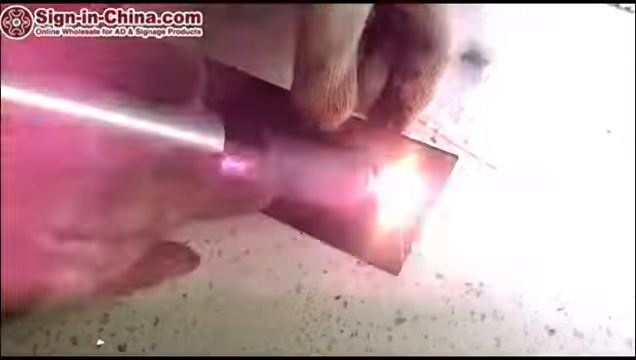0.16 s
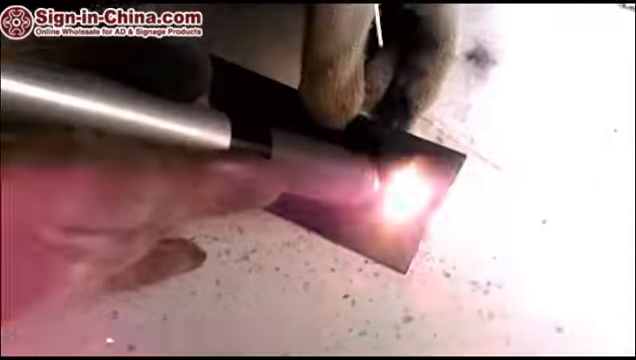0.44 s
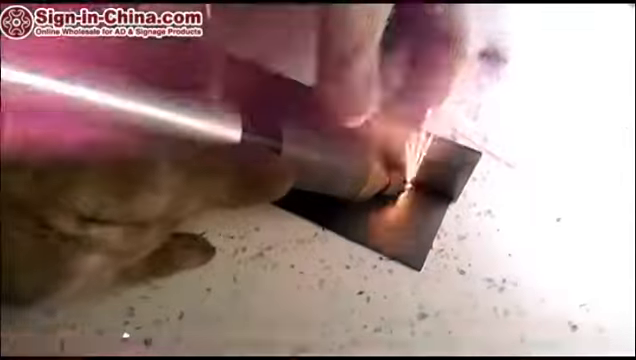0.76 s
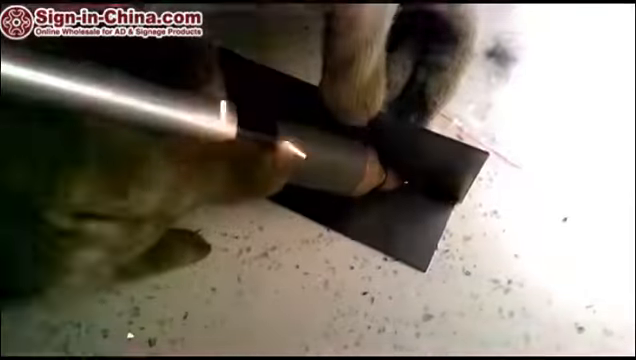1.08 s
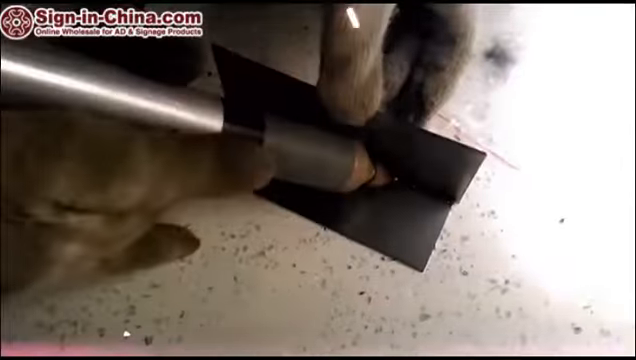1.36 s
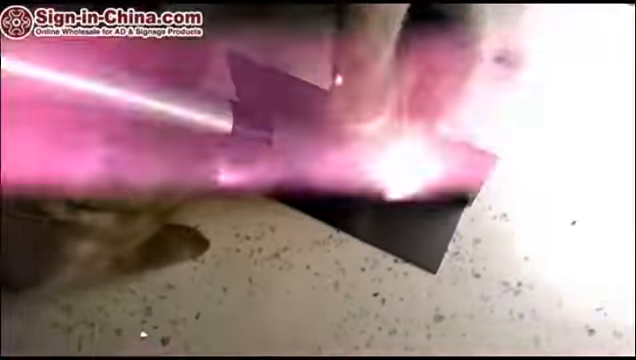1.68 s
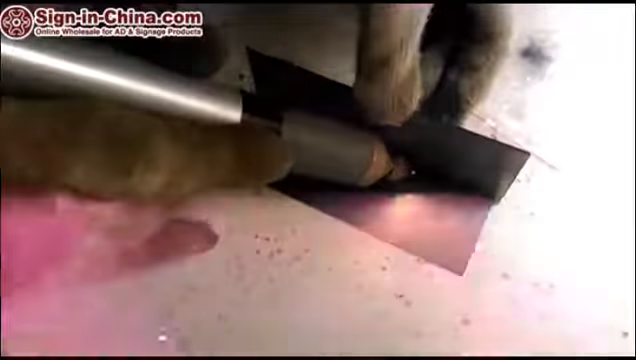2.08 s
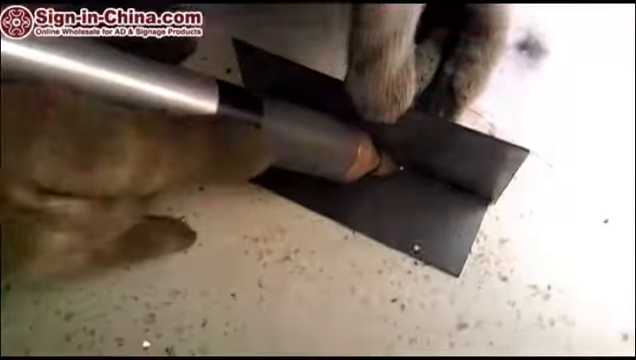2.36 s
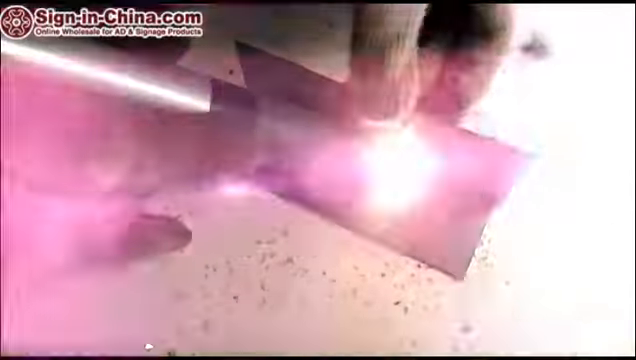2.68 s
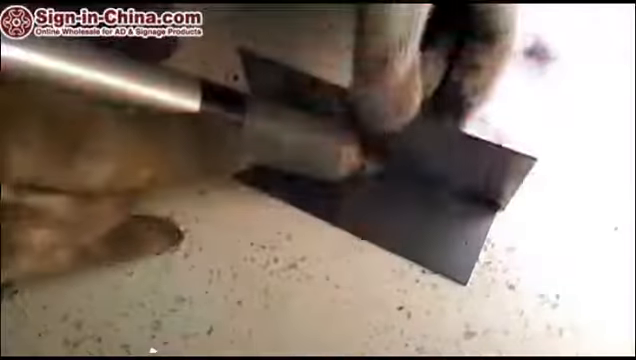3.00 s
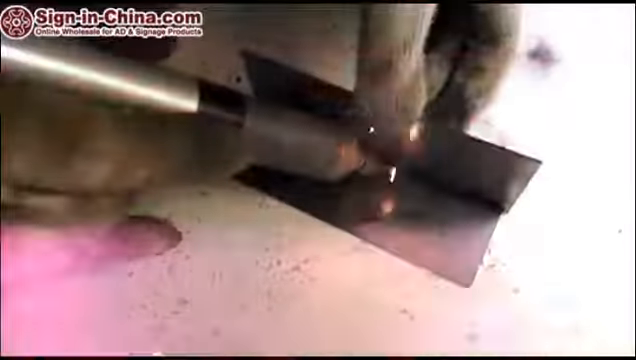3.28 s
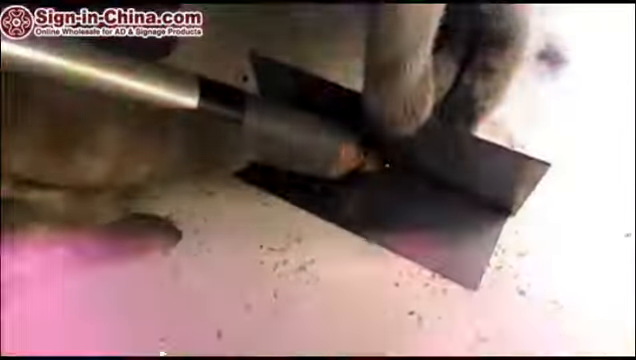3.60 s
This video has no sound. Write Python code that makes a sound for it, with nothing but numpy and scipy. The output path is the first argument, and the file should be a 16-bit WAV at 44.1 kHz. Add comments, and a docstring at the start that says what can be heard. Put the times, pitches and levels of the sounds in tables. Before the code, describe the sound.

A pulsed laser welder starts firing on a thin steel sheet at about 0.2 seconds, close by, over a low hum of machine fans. Its sharp, crackling pops repeat evenly, about eighteen a second, until the end near 3.7 seconds, with sizzling spatter, faint metallic ringing and a short room echo. The nozzle scrapes softly underneath, most around 1 second. A faint, very high whistle grows from about 2 seconds.

```python
"""Pulsed laser welding on thin steel

A hand-held laser welder fires evenly at a small steel sheet on a table, close to a two-port camera mic.
Each pulse pops as it starts and stops, the plume crackles in between, the sheet rings and spatter sizzles.
Walls echo the pops and crackle over the machine's hum and fans and the low scrape of the dragged nozzle."""
import sys
import numpy as np
from scipy import signal
from scipy.fft import rfft, irfft
from scipy.io import wavfile
from scipy.ndimage import uniform_filter1d

SR = 44100
rng = np.random.default_rng(int(sys.argv[2]) if len(sys.argv) > 2 else 0)


def unload_wav(signal):
    """Save mono or channel-first audio to the path in sys.argv[1] as 16-bit WAV at rate SR, clipped to [-1, 1]."""
    wavfile.write(
        sys.argv[1],
        SR,
        np.round(np.clip(np.atleast_2d(signal).T, -1, 1) * 32767).astype(np.int16),
    )


N = 164934

# Hum and fan bed EQ (frequency [Hz], level [dB])
FAN_EQ = [(35, -13), (139, 1), (300, -3), (2410, -13.5), (11800, -36.5), (16000, -55)]
# Beam-on pop, then beam-off pop (resonance [Hz], width [Hz], bass cut [Hz], relative level [dB])
POP_TONES = [(1470, 920, 139.5, 6), (1760, 1240, 193, 2)]
# Rings of the joint, a row per pulse (low ring [Hz], low ring [dB], middle ring [dB], upper pair [dB])
PULSES = [(2930, -27.5, -38, -23.5), (2900, -30.5, -51, -24.5), (2810, -25.5, -30, -25),
          (2730, -29, -41, -27), (3020, -32, -30, -27), (2760, -27.5, -30, -24), (2900, -25, -41, -28),
          (2330, -29, -39, -31), (2480, -26, -53, -26), (2600, -34, -40, -33.5), (2670, -27, -41, -28),
          (2600, -28, -54, -21), (2900, -30, -35, -30.5), (2730, -25.5, -27.5, -23), (2500, -29, -50, -30),
          (2600, -25, -37, -24.5), (2750, -27.5, -52, -30), (2540, -25.5, -34, -31.5),
          (2880, -26.5, -36, -28.5), (2550, -25.5, -25.5, -25), (2930, -26.5, -32, -23.5),
          (2660, -24.5, -33, -19.5), (2670, -25, -23, -24), (2830, -28.5, -30, -28), (2940, -26, -35, -27),
          (2800, -25.5, -29.5, -37), (2680, -27.5, -34, -30.5), (2800, -26, -29, -25.5),
          (3070, -28, -32, -23.5), (2940, -30, -29, -30.5), (2500, -29.5, -34.5, -30),
          (2780, -23.5, -29.5, -30), (2560, -24, -29.5, -29), (2660, -23.5, -40, -32.5),
          (2620, -23, -30, -25.5), (2820, -25, -27, -31), (2630, -22, -27.5, -24), (2850, -27, -26, -26),
          (2420, -25, -34, -24), (2760, -22.5, -30, -25), (2720, -22, -34, -27), (3320, -33, -35, -26.5),
          (2330, -22.5, -33, -30), (2620, -27.5, -46, -24.5), (2600, -26.5, -36, -24),
          (2660, -23.5, -32, -25), (2640, -25, -35, -24.5), (2640, -23, -52, -29), (2610, -21.5, -36, -28),
          (2530, -20.5, -23, -28.5), (2460, -24.5, -25.5, -24), (2280, -31, -24.5, -26.5),
          (2730, -28.5, -29.5, -27), (2480, -21, -34, -27.5), (2510, -16, -36, -22.5),
          (2510, -24.5, -18, -30), (3340, -32, -27, -27.5), (2520, -24, -26, -26),
          (2920, -26.5, -30.5, -25.5), (2480, -24.5, -35, -27), (2600, -26, -20.5, -21),
          (2670, -25.5, -31, -29), (2430, -23, -31, -22), (2540, -24.5, -26.5, -29),
          (2470, -28, -26.5, -24.5)]
# Drift of the upper pair's lower ring (time [s], pitch [Hz], gain against its partner [dB])
RING_DRIFT = [(.18, 5570, 11), (1.3, 5980, 0.5)]
# Broadband crackle EQ (frequency [Hz], level [dB])
CRACKLE_EQ = [(1000, -3), (2100, 1), (3600, 2.5), (7800, -5.5), (10500, -2), (12000, -5.5), (16500, -6.5)]
# Level ride of the plume's whistle (time [s], level [dB])
WHISTLE_RIDE = [(.18, -47), (1.5, -54), (1.75, -41), (2.0, -47), (2.15, -35), (3.0, -30), (3.15, -43),
                (3.3, -32)]
# Crackle pan (time [s], left over right [dB])
CRACKLE_PAN = [(1.6, 2), (2.55, -1), (3.2, 1.5)]
# Treble loss at the left mic port (frequency [Hz], gain [dB])
LEFT_PORT_EQ = [(8000, -1.5), (11000, -6)]
# Modes of sheet and table (frequency [Hz], level [dB], T60 [s])
SHEET_MODES = [(643, -31.5, 0.064), (979.6, -48, 0.63), (2304, -36.5, 0.12)]
# Sizzle EQ of the spatter (frequency [Hz], level [dB])
SIZZLE_EQ = [(1600, -15), (2200, 4), (7300, 0), (8200, -12.5), (13000, -15.5)]
# Reverb EQ (frequency [Hz], gain [dB])
ROOM_EQ = [(60, -4), (250, 2.5), (450, -2.5), (900, 2.5), (1400, -7.5), (7500, 9), (16000, 6)]
# Level ride of the nozzle scrape (time [s], level [dB])
SCRAPE_RIDE = [(.2, -55), (.65, -45.5), (1.05, -41), (1.3, -48.5), (1.85, -47.5), (2.3, -49), (3.74, -48)]

FIRST_S, RATE_HZ, PULSE_S = .18, 18.0002, .00252
PULSE_TIMES = FIRST_S + np.arange(len(PULSES)) / RATE_HZ
WHISTLE_HZ, WHISTLE_WIDTH_HZ = 15150, 400


def undb(db):
    """Decibels to linear gain."""
    return 10 ** (np.asarray(db) / 20)


def level(x, db):
    """Scale to an rms level."""
    return x * undb(db) / np.sqrt(np.mean(x ** 2))


def ride(time_s, table, column=1):
    """Read an automation curve at a given time."""
    points = np.array(table)
    return np.interp(time_s, points[:, 0], points[:, column])


def eq(x, table):
    """Filter through (frequency [Hz], gain [dB]) points."""
    hz, db = np.array(table).T
    n = x.shape[-1]
    bins_hz = np.maximum(np.arange(n // 2 + 1) * SR / n, 1)
    return irfft(rfft(x) * undb(np.interp(np.log(bins_hz), np.log(hz), db)), n)


def ring(x, hz, width_hz):
    """Steep resonance: two peak filters in series, unity gain at the centre."""
    for width in (width_hz, 2 * width_hz):
        x = signal.lfilter(*signal.iirpeak(hz, hz / width, fs=SR), x)
    return x


def delay(x, lag_s):
    """Delay by any fraction of a sample."""
    n = x.shape[-1]
    return irfft(rfft(x) * np.exp(-2j * np.pi * np.arange(n // 2 + 1) * SR / n * lag_s), n)


def stereo_noise(count, mono_below_hz=785):
    """Noise at the two mic ports: mono in the bass, wide in the treble."""
    mid, side = rng.standard_normal((2, count))
    side = signal.sosfilt(signal.butter(2, mono_below_hz, "high", fs=SR, output="sos"), side)
    return np.array([mid + side, mid - side])


def sequence(shots):
    """Lay one stereo one-shot on each pulse of the firing clock."""
    track = np.zeros((2, N + 4096))
    for at, shot in zip(PULSE_TIMES, shots):
        start = int(at * SR)
        track[:, start:start + shot.shape[-1]] += shot
    return track[:, :N]


def fans():
    """The machine's hum and fans: a steady bed of dark noise."""
    return level(eq(stereo_noise(N), FAN_EQ), -47.5)


def beam_pops(peak_db=-9.5, scatter_db=1.14, bass_damping=.6, right_lag_s=.00007):
    """Pressure dips as the beam starts and pushes as it stops; the nozzle rounds off both kicks."""
    pop = np.zeros((2, 1024))
    for sign, onset, (hz, width_hz, bass_hz, db) in zip((-1, 1), (0, int(PULSE_S * SR)), POP_TONES):
        w, w_bass = 2 * np.pi * hz, 2 * np.pi * bass_hz
        kick = uniform_filter1d(1. * (np.arange(1024) == onset + 4), size=7)
        bass_cut = signal.bilinear([1, 0, 0], [1, bass_damping * w_bass, w_bass ** 2], SR)
        kick = signal.lfilter(*bass_cut, kick)
        for port, damping in enumerate((1, 1.49)):  # duller at the right port
            nozzle = signal.bilinear([w * w], [1, 2 * np.pi * width_hz * damping, w * w], SR)
            pop[port] += sign * undb(db) * signal.lfilter(*nozzle, kick)
    pop *= undb(peak_db) / np.abs(pop).max()
    pop[1] = delay(pop[1], right_lag_s)
    return sequence(pop * undb(db) for db in rng.normal(0, scatter_db, len(PULSES)))


def plume_crackle(attack_s=.001, release_at_s=.0031, release_s=.0009, unshared=.15):
    """The boiling plume hisses through the rings of the joint, with a broad band and a thin whistle."""
    t = np.arange(512) / SR
    envelope = np.minimum(t / attack_s, 1) * np.exp(-np.maximum(t - release_at_s, 0) / release_s)
    shots = []
    for at, (low_hz, low_db, mid_db, upper_db) in zip(PULSE_TIMES, PULSES):
        noise = rng.standard_normal((5, 3, 512))  # five layers, each with shared, left and right noise
        bursts = (np.sqrt(1 - unshared) * noise[:, :1] + np.sqrt(unshared) * noise[:, 1:]) * envelope
        low = level(ring(bursts[0], low_hz, width_hz=520), low_db)
        mid = level(ring(bursts[1], hz=4450, width_hz=600), mid_db)
        drift_hz, drift_db = ride(at, RING_DRIFT), ride(at, RING_DRIFT, column=2)
        drifting = undb(drift_db) * ring(bursts[2], drift_hz, width_hz=600)
        upper = level(drifting + ring(bursts[2], hz=6846, width_hz=880), upper_db)
        broad = level(eq(bursts[3], CRACKLE_EQ), -15 + .35 * upper_db)
        whistle = level(ring(bursts[4], WHISTLE_HZ, WHISTLE_WIDTH_HZ), ride(at, WHISTLE_RIDE))
        left = eq((low + mid + upper + broad)[0], LEFT_PORT_EQ) + whistle[0]
        right = delay(low[1], lag_s=-.00003) + delay(mid[1], lag_s=.00018)
        right += delay((upper + broad + whistle)[1], lag_s=.00012)
        pan_db = ride(at, CRACKLE_PAN)
        shots.append(np.array([left * undb(pan_db / 2), right * undb(-pan_db / 2)]))
    return sequence(shots)


def sheet_ring(attack_s=.013, scatter_db=2):
    """Every pulse strikes the modes of the sheet and table, which ring dead centre."""
    t = np.arange(4096) / SR
    strikes = undb(rng.normal(0, scatter_db, (len(PULSES), len(SHEET_MODES))))
    modes = np.array([undb(db - 60 * t / t60) * np.sin(2 * np.pi * hz * t)
                      for hz, db, t60 in SHEET_MODES])
    attack = np.minimum(t / attack_s, 1)
    return sequence(np.tile(gains @ modes * attack, (2, 1)) for gains in strikes)


def spatter(attack_s=.014, burst_t60_s=.059, tail_t60_s=.5, scatter_db=2.5, grit_db=2.3):
    """Hot drops sizzle after each pulse, fading fast and then slowly; the whistle lingers."""
    t = np.arange(4096) / SR
    attack = np.minimum(t / attack_s, 1) ** 2
    tail = attack * undb(-60 * t / tail_t60_s)
    envelope = attack * undb(-60 * t / burst_t60_s) + undb(-13) * tail
    shots = []
    for at, (_, *rings_db) in zip(PULSE_TIMES, PULSES):
        drops_trim_db, whistle_trim_db = rng.normal((-13, -19), scatter_db)
        pulse_db = 10 * np.log10(np.sum(undb(rings_db) ** 2))
        grit = undb(grit_db * rng.exponential(size=4096))
        drops = eq(stereo_noise(4096) * grit, SIZZLE_EQ)
        drops = level(drops, drops_trim_db + .6 * pulse_db)  # louder pulses sizzle harder
        drops[0] = eq(drops[0], LEFT_PORT_EQ)
        whistle = ring(stereo_noise(4096), WHISTLE_HZ, WHISTLE_WIDTH_HZ)
        whistle = level(whistle, ride(at, WHISTLE_RIDE) + whistle_trim_db)
        shots.append(envelope * drops + tail * whistle)
    return sequence(shots)


def room(send, predelay_s=.011, spread_s=.003, early_t60_s=.06, tail_t60_s=1):
    """A tight cluster of echoes off the nearest walls, then a diffuse tail."""
    t = np.arange(SR // 2) / SR
    onset = 1 / (1 + np.exp(-(t - predelay_s) / (spread_s / 2)))
    early = onset * undb(-60 * t / early_t60_s)
    tail = onset * undb(-60 * t / tail_t60_s)
    envelope = undb(-14) * early / np.linalg.norm(early) + undb(-26.5) * tail / np.linalg.norm(tail)
    impulse = eq(stereo_noise(len(t)), ROOM_EQ) * envelope
    return signal.fftconvolve(send, impulse, axes=1)[:, :N]


def nozzle_scrape(slip_samples=600, judder_db=2):
    """The nozzle drags over the sheet: a low rasp whose level judders with each slip."""
    slips = np.repeat(rng.standard_normal(N // slip_samples + 1), slip_samples)
    judder = uniform_filter1d(slips, size=slip_samples)[:N]
    rasp = level(ring(stereo_noise(N), hz=417, width_hz=780), 0)
    return rasp * undb(ride(np.arange(N) / SR, SCRAPE_RIDE) + judder_db * judder)


def scene():
    """Mix the weld and its reverb over the scrape and the machine bed."""
    pops, crackle = beam_pops(), plume_crackle()
    send = pops + undb(-5) * crackle  # the joint beams its rings away from the walls
    return pops + crackle + sheet_ring() + spatter() + room(send) + nozzle_scrape() + fans()


def record(dry):
    """The camera rolls off the sub bass and cuts the top steeply."""
    low_cut = signal.butter(2, 40, "high", fs=SR, output="sos")
    high_cut = signal.cheby2(14, 90, 16750, fs=SR, output="sos")
    return signal.sosfilt(high_cut, signal.sosfilt(low_cut, dry))


dry = scene()
out = record(dry)
unload_wav(out)
```